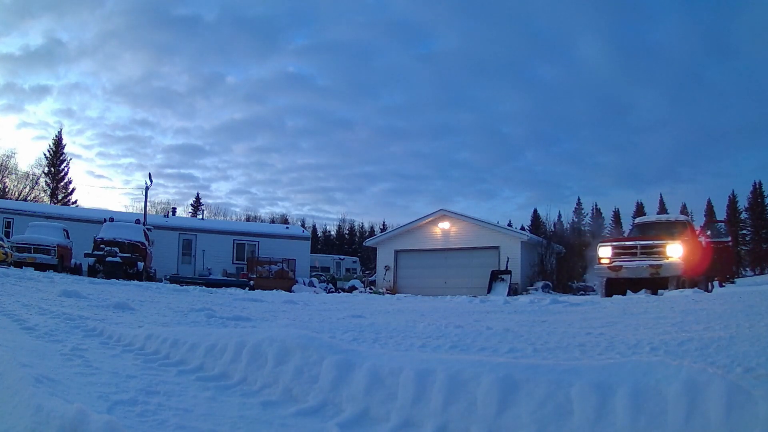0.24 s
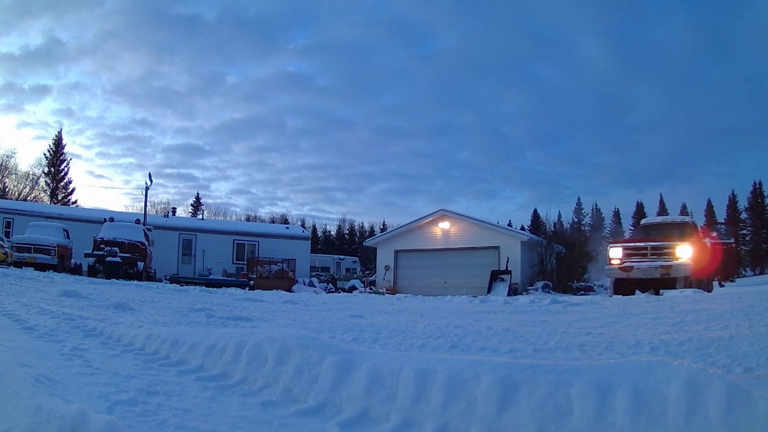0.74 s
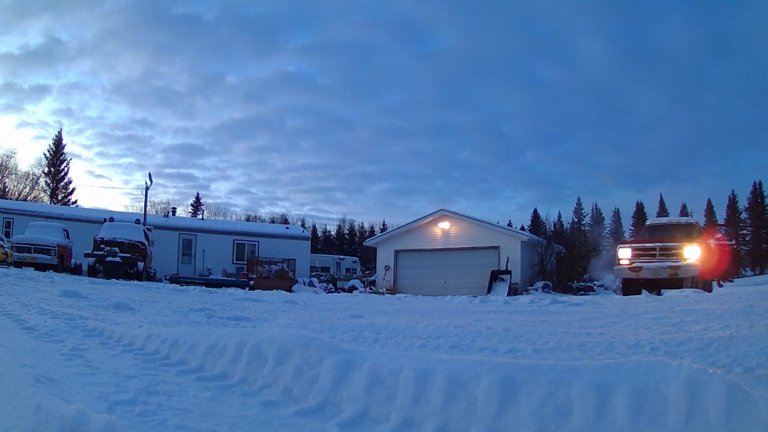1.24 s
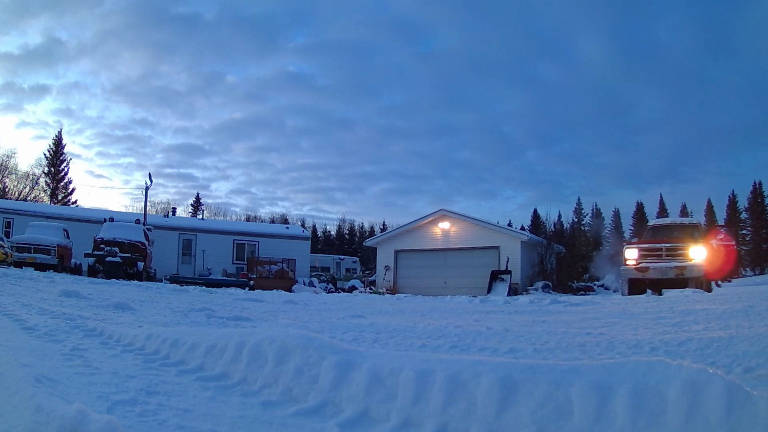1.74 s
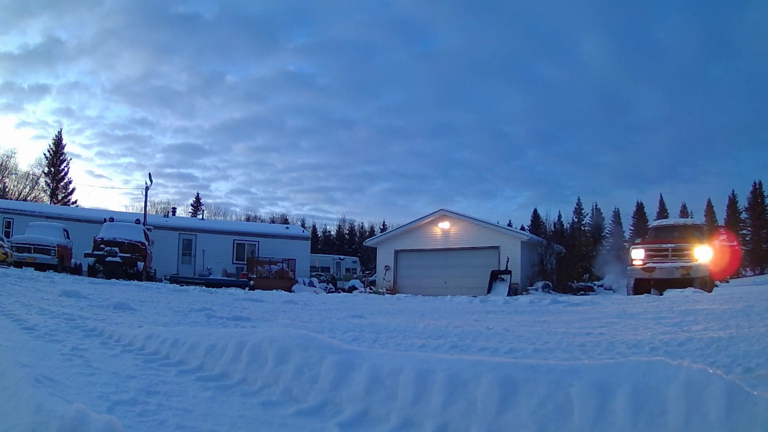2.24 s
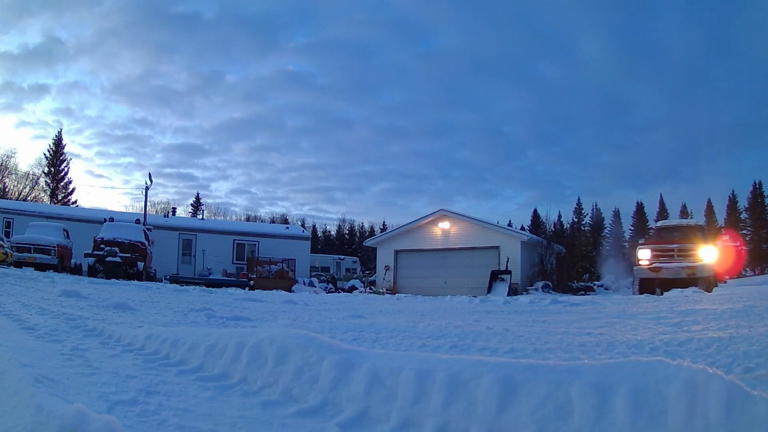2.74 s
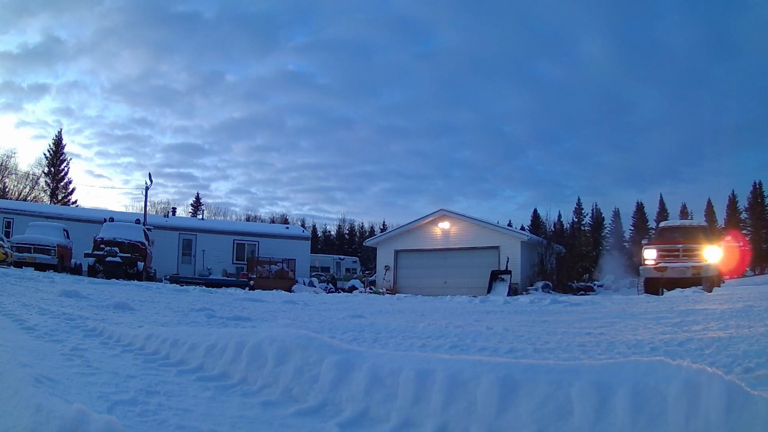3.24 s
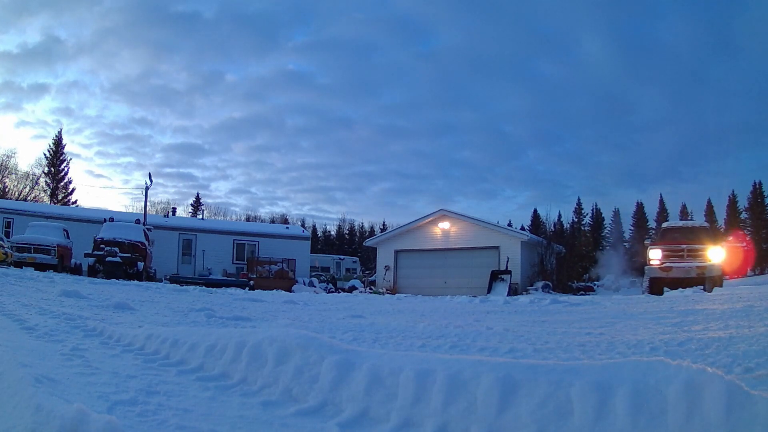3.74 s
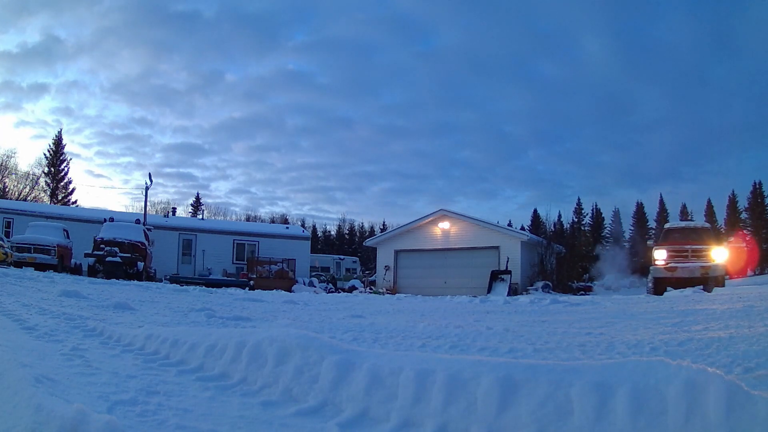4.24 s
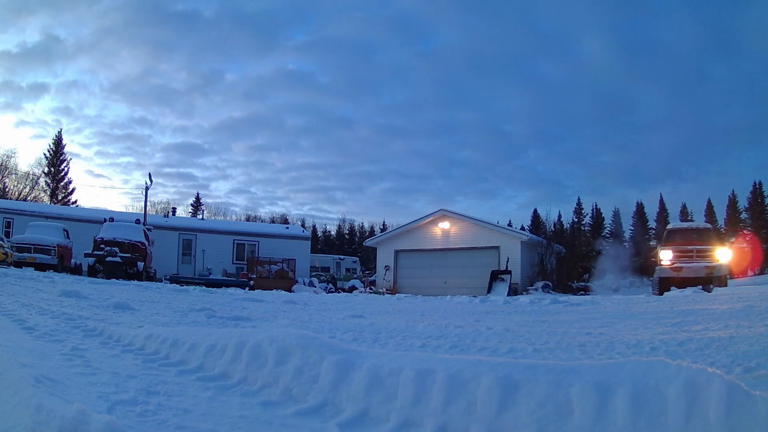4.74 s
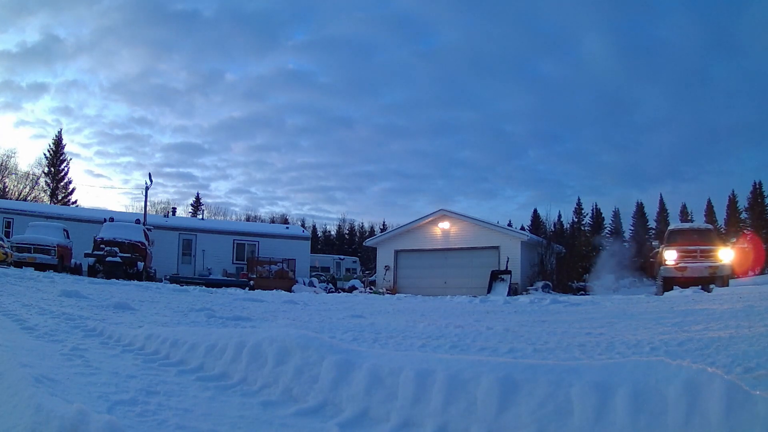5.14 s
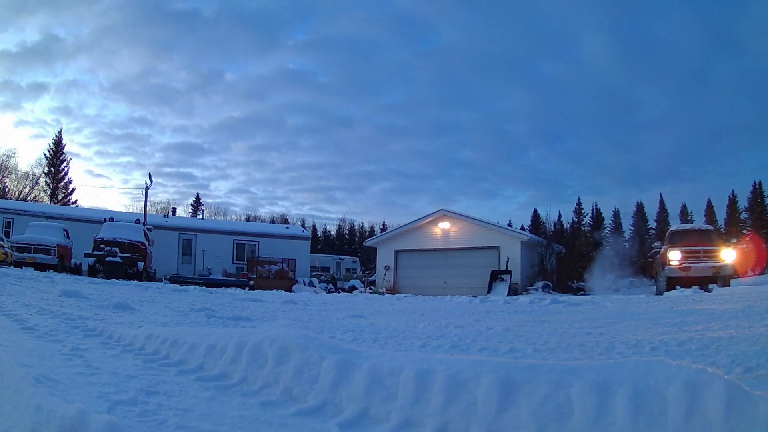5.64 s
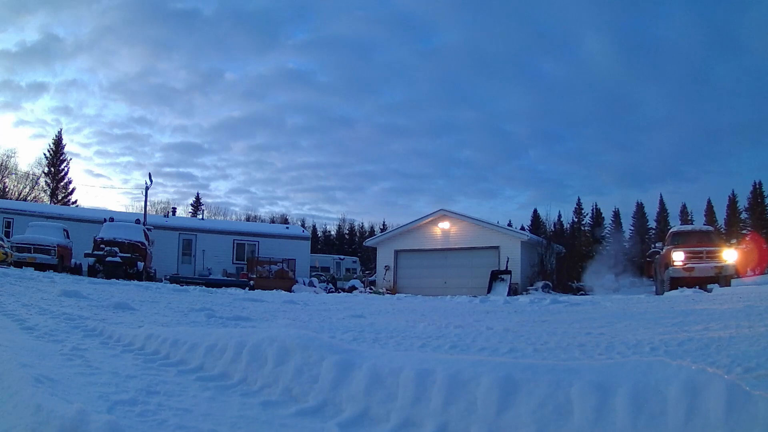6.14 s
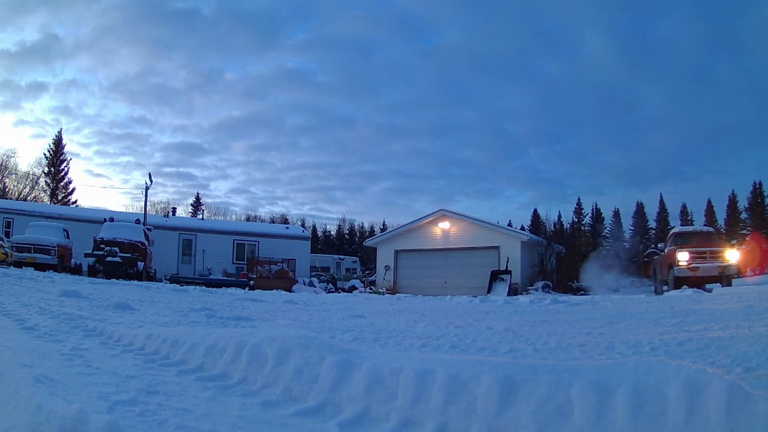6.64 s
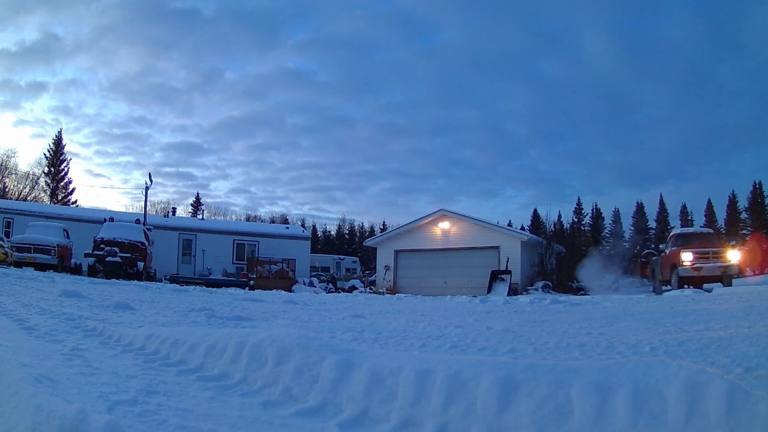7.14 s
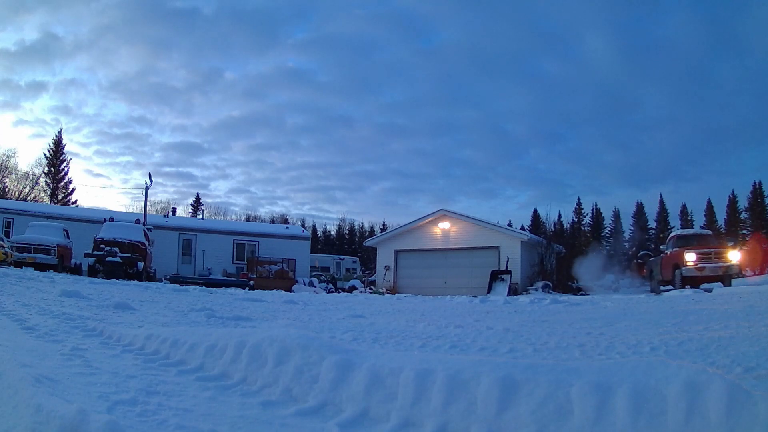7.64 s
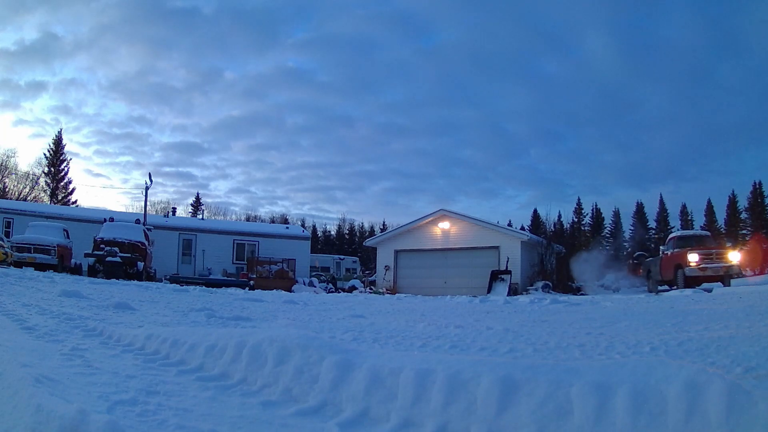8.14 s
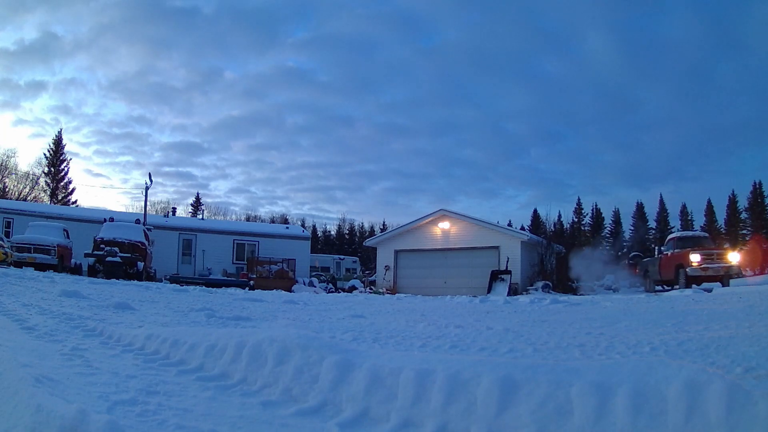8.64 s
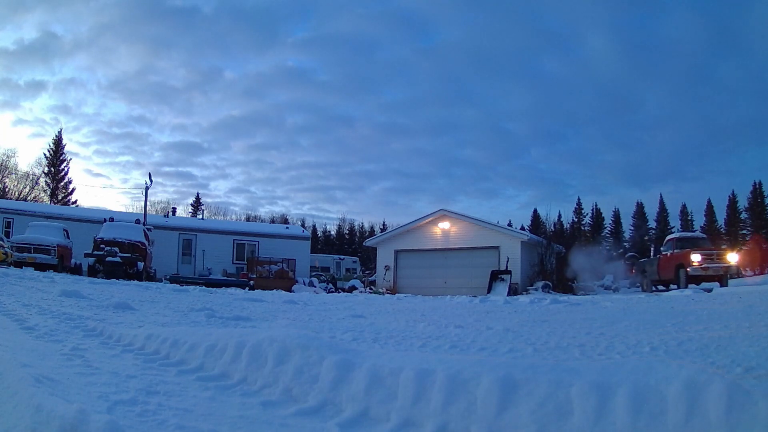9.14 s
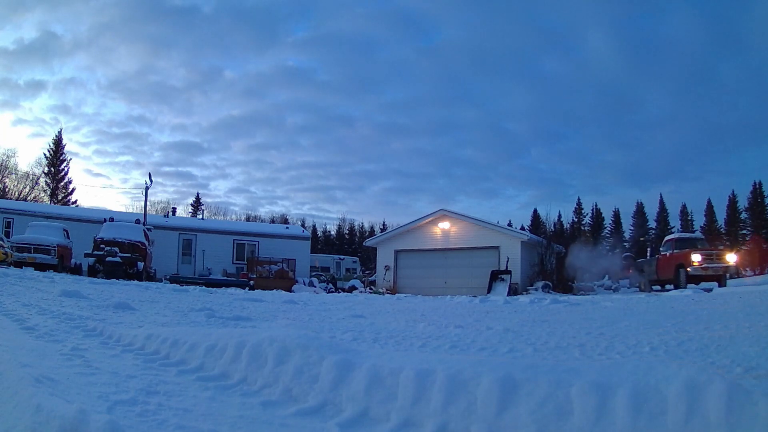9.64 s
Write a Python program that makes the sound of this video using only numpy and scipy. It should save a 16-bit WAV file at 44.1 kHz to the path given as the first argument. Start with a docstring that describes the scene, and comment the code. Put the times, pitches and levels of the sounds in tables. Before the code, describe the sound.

A pickup truck idles with a deep uneven burble in a snowy yard, knocks dully, then drones low under heavy load before dropping back to idle.

```python
"""A V8 pickup idles in a snowy yard; two dull knocks and a gritty scuff come as the drive takes hold.
It then backs away under a heavy load with a low drone, a breathy whine and, late on, a ticking manifold;
at last it drops back to idle. Harmonics of the firing rate make the drone, filtered uneven impulses the
burble, gated noise the ticks, and shaped or ringing noise the rest. All but the drone has dull echoes."""
import sys
import numpy as np
from scipy import signal
from scipy.fft import rfft, irfft, next_fast_len
from scipy.io import wavfile

SR = 44100
rng = np.random.default_rng(int(sys.argv[2]) if len(sys.argv) > 2 else 0)


def to_wav(s):
    """Save 16-bit WAV."""
    ch = np.atleast_2d(s).T  # columns
    pcm = np.round(np.clip(ch, -1, 1) * 32767)  # PCM
    wavfile.write(sys.argv[1], SR, pcm.astype(np.int16))


N = 437031
TIME = np.arange(N) / SR   # seconds

# Buildings and trees that return echoes: delay_s, level_db
ECHOES = [(.047, -16), (.109, -19), (.183, -22)]
# Spectrum of the microphone hiss: frequency_hz, level_db
HISS = [(100, 5), (3000, 0.1), (8000, -2), (10000, 0.49), (11000, -.5), (12100, 1.8), (13200, 0),
        (16000, 0)]
# Ringing modes of belts and pulleys: frequency_hz, width_hz, level_db
PULLEYS = [(3500, 215, 5), (4470, 500, 2.5), (5270, 450, 0)]
# Spectrum of the fan and intake rush: frequency_hz, level_db
RUSH = [(25, 2), (100, 18), (250, 14.5), (330, 7.5), (420, 1), (600, -5), (900, -9.5), (1400, -12.5),
        (2000, -14), (2600, -16), (3200, -23), (5000, -23), (8000, -27.5), (16000, -46)]
# Dull knocks of the chassis: start_s, level_db
KNOCKS = [(0.584, -43.5), (.825, -55)]
# Spectrum of the scuff in the drive: frequency_hz, level_db
SCRAPE = [(600, -13), (1300, -1), (2000, 3), (3200, -8), (4000, -2), (4550, 8), (5200, -6), (7000, -7),
          (12000, -36)]
# Spectrum of gas puffing past the gasket: frequency_hz, level_db
PUFF = [(500, -16), (1150, -2), (1900, -4), (2250, -2), (2500, 3), (2900, -2), (3300, -7), (3900, -12),
        (4600, -6), (5500, -9), (7000, -22), (14000, -42)]
# Cylinders in firing order: bank (+1 or -1), push (pulse under load, relative to the mean),
# leak_strength (gain)
CYLINDERS = [(1, 1.9, .75), (-1, -.6, 1.0), (1, 1.0, .4), (-1, -.4, .85), (-1, -1.0, .9), (1, -.1, .4),
             (-1, -1.0, .6), (1, .3, .4)]
# Exhaust response for the deep lope at idle: frequency_hz, level_db
LOPE_PIPE = [(15, -47), (32, -9), (45, -0.5), (60, 11.5), (74, 8), (105, -17.5), (130, 4.5), (170, 1),
             (400, -28.5), (4000, -100)]
# Ring of the tailpipe at idle: frequency_hz, level_db
TAILPIPE_RING = [(20, -71), (90, -38.5), (130, -7.5), (150, -1.5), (175, 3.5), (203, 1), (225, -11.5),
                 (290, -18.5), (350, -26.5), (500, -36), (900, -47.5), (4000, -100)]
# Exhaust response under load: frequency_hz, level_db
LOAD_PIPE = [(15, -16), (38, -7), (66, 4), (86, -2), (100, 5), (109, -6), (124, 0), (145, -2), (166, 0),
             (190, -10), (228, -3), (240, -10), (262, -10), (283, -7), (320, -23), (450, -34), (4000, -100)]
# Muffler resonances that the drone's harmonics slide through: frequency_hz, level_db
MUFFLER = [(46, -12), (55, -4.5), (60, -3.5), (62.3, 0.5), (88, -3), (103, -2.5), (116, -7), (125, -3.5),
           (133, -7), (155, -13), (173, -3.5), (182, -9.5), (187, -26)]
# Slow swell and fade of the drone's harmonics: time_s, first_db, second_db, third_db
SWELL = [(0, -4, -3, -2), (1.8, -2, -1.5, 0), (2.6, -3, -1.5, -2.5), (4.2, 1.1, -1, -0.5),
         (7.2, -0.4, 3, -3), (9.07, 4.5, 0.5, -6.5), (9.25, 3, -2.5, -4)]
# Engine speed: time_s, firing_rate_hz
SPEED = [(0.0, 43.94), (0.95, 44.48), (1.09, 41.25), (1.31, 45.88), (1.48, 47.66), (1.9, 57.54),
         (2.73, 57.32), (3.87, 60.09), (4.31, 62.35), (4.66, 61.16), (4.89, 62.55), (5.14, 62.12),
         (6.12, 62.88), (7.34, 62.87), (8.95, 62.02), (9.29, 46.28), (9.52, 45.18), (9.91, 46.41)]

# Load: it builds, holds and is let go
PULL_START_S, LOAD_ATTACK_S, PULL_END_S, LOAD_RELEASE_S = 1.45, .35, 9.03, .16
# Belts: level at the start, change over the whole way backed
BELT_DB, BELT_AWAY_DB = -68.5, -4.5
# Rush: level at idle, gain under load, change over the whole way backed, further gain by the end of the pull
RUSH_DB, RUSH_LOAD_DB, RUSH_AWAY_DB, RUSH_STRAIN_DB = -44, 1.5, -0.5, 1
# Manifold leak: it opens late in the pull and grows until it closes
LEAK_START_S, LEAK_ATTACK_S, LEAK_END_S, LEAK_RELEASE_S = 6.45, .45, 8.93, .15
LEAK_DB, LEAK_GROWTH_DB_PER_S = -68, 3.2   # level is that at the start
# Burble: gain at idle on top of the levels of its parts, change over the whole way backed,
# further change as the loaded engine evens out
BURBLE_DB, BURBLE_AWAY_DB, BURBLE_EVEN_DB = -43.5, -3, -2
ROUGHNESS = .3   # spread of the pulse from one firing to the next
# Drone before muffler and swell: first harmonic at idle, gain under load, step to each higher harmonic
DRONE_DB, DRONE_LOAD_DB, DRONE_STEP_DB = -27.5, 4.5, -4


def from_db(db):
    """Logarithmic level: decibels become an amplitude gain."""
    return 10 ** (np.asarray(db) / 20)


def rms_one(x):
    """Power normalisation: the mean square becomes one."""
    return x / np.sqrt(np.mean(x ** 2) + 1e-20)


def in_time(rows):
    """Linear interpolation: each column of a curve is read at every sample."""
    time_s, *columns = np.transpose(rows)
    return [np.interp(TIME, time_s, column) for column in columns]


def ramp(start_s, length_s):
    """Linear onset: a straight rise from 0 to 1."""
    return np.clip((TIME - start_s) / length_s, 0, 1)


def noise():
    """White noise: equal mean power at all frequencies."""
    return rng.standard_normal(N)


def drift(rate_hz):
    """Slow random modulation: chance values joined by lines, scaled to unit power."""
    values = rng.standard_normal(2000)
    return rms_one(np.interp(TIME * rate_hz, np.arange(2000), values))


def colour(x, spectrum):
    """Minimum-phase filtering: the folded cepstrum gives a causal filter with the given response."""
    size = 2 * next_fast_len(N // 2 + SR // 4)
    hz, db = np.transpose(spectrum)
    bins_hz = np.maximum(np.fft.rfftfreq(size, 1 / SR), 1)
    response_db = np.interp(np.log(bins_hz), np.log(hz), db)
    cepstrum = irfft(np.log(from_db(response_db)))
    cepstrum[1:size // 2] *= 2
    cepstrum[size // 2 + 1:] = 0
    response = np.exp(rfft(cepstrum))
    return irfft(rfft(x, size) * response)[:N]


def resonate(x, hz, width_hz):
    """Damped resonance: a pole pair rings, with gain close to 1 at its peak."""
    r = np.exp(-np.pi * width_hz / SR)
    zeros = np.array([1, 0, -1]) * (1 - r * r) / 2
    poles = [1, -2 * r * np.cos(2 * np.pi * hz / SR), r * r]
    return signal.lfilter(zeros, poles, x)


def ring_twice(x, hz, width_hz):
    """Cascaded resonance: a second, twice as wide, steepens the skirts of the first."""
    return resonate(resonate(x, hz, width_hz), hz, 2 * width_hz)


def firings(turn):
    """Cyclic firing order: the sample of each firing and the table columns of its cylinder."""
    at = np.flatnonzero(np.diff(np.floor(turn)) > 0)
    cylinder = np.floor(turn[at]).astype(int) % len(CYLINDERS)
    return at, np.array(CYLINDERS)[cylinder].T


def clicks(at, sizes):
    """Impulse excitation: single samples of the given sizes."""
    out = np.zeros(N)
    out[at] = sizes
    return out


def yard(x, wall_hz=1500):
    """Delayed reflection: a few echoes return with their treble absorbed."""
    dull = signal.sosfilt(signal.butter(1, wall_hz, fs=SR, output="sos"), x)
    echoes = sum(from_db(db) * np.interp(TIME - delay_s, TIME, dull, left=0) for delay_s, db in ECHOES)
    return x + echoes


def ground_dip(x, hz=390, width_hz=260, depth=0.49):
    """Ground attenuation: the low middle thins over the snow as the truck backs away."""
    far = np.interp(TIME, [5.8, 8.3], [0, 1])
    return x - depth * far * resonate(x, hz, width_hz)


def belts(turn, flicker_db=1.65, swing=0.056):
    """Friction excitation: rubbing noise, swelling once per engine cycle, keeps the pulleys ringing."""
    cycle = np.sin(2 * np.pi * turn / len(CYLINDERS))
    rub = noise() * (1 + swing * cycle)
    rings = 0
    for hz, width_hz, db in PULLEYS:
        rings = rings + from_db(db + flicker_db * drift(14)) * ring_twice(rub, hz, width_hz)
    return rms_one(rings)


def whine():
    """Narrow-band resonance: noise rings as the drive line's breathy whine while the truck gets moving."""
    on = np.interp(TIME, [1.5, 1.85, 5.5, 7.0], [0, 1, .7, 0])
    ring = ring_twice(noise(), 1315, 130)
    return on * from_db(-69 + 2 * drift(20)) * rms_one(ring)


def engine_bay(turn, throb=0.013, lope=0.0084, flutter_db=0.32):
    """Amplitude modulation: fan and intake rush pulses with each firing and each engine cycle."""
    firing = np.cos(2 * np.pi * turn)
    cycle = np.cos(2 * np.pi * turn / len(CYLINDERS))
    pulsing = 1 + throb * firing + lope * cycle
    return from_db(flutter_db * drift(25)) * rms_one(colour(pulsing * noise(), RUSH))


def knocks(hz=330, width_hz=130, decay_s=0.02):
    """Exponential decay: resonant noise dies away after each thud of a loose part on the frame."""
    shake = sum(from_db(db) * (TIME > start_s) * np.exp(-np.abs(TIME - start_s) / decay_s)
                for start_s, db in KNOCKS)
    return shake * rms_one(ring_twice(noise(), hz, width_hz))


def take_up(level_db=-57):
    """Sliding friction: rapidly fluctuating noise scuffs briefly as the drive takes hold."""
    stroke = np.interp(TIME, [.925, .957, .97, 1.01, 1.065], [0, .4, 1, .9, 0])
    grit = from_db(1.5 * drift(190))
    return from_db(level_db) * stroke * rms_one(colour(noise() * grit, SCRAPE))


def manifold_leak(turn, puff_s=0.0025, spread_db=2.2):
    """Jet noise: bursts of gas pass the gasket, stronger at some cylinders and never quite alike."""
    at, (_, _, strength) = firings(turn + 0.28)   # heard before the pulse leaves the tailpipe
    sizes = strength * from_db(spread_db * np.clip(noise()[at], -2, 2))
    r = np.exp(-1 / (puff_s * SR))
    # a double pole makes each puff rise and fall smoothly
    gate = signal.lfilter([1], [1, -2 * r, r * r], clicks(at, sizes) + 1e-18)
    return rms_one(colour(gate * noise(), PUFF))


def burble(turn, load, lope_db=4.5, bark_db=7, pull_db=8.5):
    """Subharmonic excitation: unequal banks and chance from firing to firing drive the pipe's resonances."""
    chance = ROUGHNESS * noise()
    at, (_, push, _) = firings(turn)
    pulses = clicks(at, push - push.mean() + chance[at])
    pull = from_db(pull_db) * rms_one(colour(pulses, LOAD_PIPE))
    # at idle only the near bank sets the tailpipe ringing
    at, (bank, _, _) = firings(turn - .1)
    near_pulses = clicks(at, 1 - bank + chance[at])
    bark = from_db(bark_db) * rms_one(colour(near_pulses, TAILPIPE_RING))
    # the deep lope comes out of the muffler most of a firing later
    at, (bank, _, _) = firings(turn - .74)
    bank_pulses = clicks(at, bank + chance[at])
    lope = from_db(lope_db) * rms_one(colour(bank_pulses, LOPE_PIPE))
    # the square roots make a power crossfade from idle to load
    return np.sqrt(1 - load) * (lope + bark) + np.sqrt(load) * pull


def drone_levels(rate, load):
    """Resonant transmission: load raises all harmonics, the muffler those that meet its resonances."""
    hz, resonance_db = np.transpose(MUFFLER)
    source_db = DRONE_DB + DRONE_LOAD_DB * load
    levels_db = []
    for k, swell_db in enumerate(in_time(SWELL)):
        muffler_db = np.interp(np.log((k + 1) * rate), np.log(hz), resonance_db)
        levels_db.append(source_db + DRONE_STEP_DB * k + muffler_db + swell_db)
    return levels_db


def drone(turn, levels_db, waver_db=0.38):
    """Fourier synthesis: the muffler rounds even firings to lopsided pressure dips of a few harmonics."""
    lag, lean = 1.1, .75   # radians
    out = 0
    for k, db in enumerate(levels_db, 1):
        delay = lag * (k + (k - 1) * (k - 2))   # upper harmonics linger longer in the pipe
        gain = from_db(db + waver_db * drift(17))
        out = out - gain * np.cos(2 * np.pi * k * turn - delay + lean)
    return np.sqrt(2) * out


def scene():
    """Superposition: engine speed, load and the way backed govern the sources, which add up."""
    rate, = in_time(SPEED)
    turn = np.cumsum(rate) / SR   # counts firings
    load = ramp(PULL_START_S, LOAD_ATTACK_S) * (1 - ramp(PULL_END_S, LOAD_RELEASE_S))
    away = np.cumsum(load) / np.sum(load)   # share of the way backed: the truck moves while it pulls

    belt_gain = from_db(BELT_DB + BELT_AWAY_DB * away)
    rush_gain = from_db(RUSH_DB + RUSH_LOAD_DB * load + (RUSH_AWAY_DB + RUSH_STRAIN_DB * load) * away)
    front = belt_gain * belts(turn) + rush_gain * engine_bay(turn)

    leak_open = ramp(LEAK_START_S, LEAK_ATTACK_S) * (1 - ramp(LEAK_END_S, LEAK_RELEASE_S))
    leak_gain = leak_open * from_db(LEAK_DB + LEAK_GROWTH_DB_PER_S * (TIME - LEAK_START_S))
    burble_gain = from_db(BURBLE_DB + (BURBLE_AWAY_DB + BURBLE_EVEN_DB * load) * away)
    exhaust = leak_gain * manifold_leak(turn) + burble_gain * burble(turn, load)

    truck = front + whine() + knocks() + take_up() + exhaust
    low_drone = drone(turn, drone_levels(rate, load))
    return (yard(ground_dip(truck)) + low_drone)[None]


def record(dry, hiss_db=-62.5, tone_db=-86, cutoff_hz=15720):
    """Band limiting: the microphone adds hiss and a thin steady tone, and a steep filter cuts the top."""
    hiss = from_db(hiss_db) * rms_one(colour(noise(), HISS))
    tone = from_db(tone_db) * np.sqrt(2) * np.sin(2 * np.pi * 13750 * TIME)
    low_pass = signal.ellip(12, .1, 90, cutoff_hz, fs=SR, output="sos")
    return signal.sosfilt(low_pass, dry + hiss + tone)


dry = scene()
out = record(dry)
to_wav(out)
```